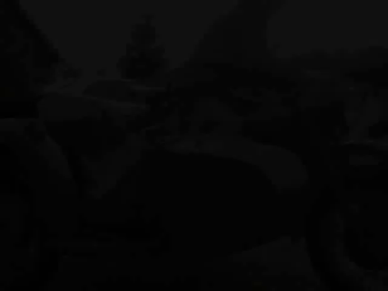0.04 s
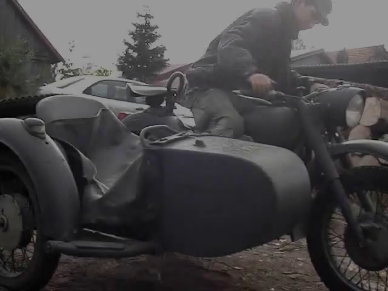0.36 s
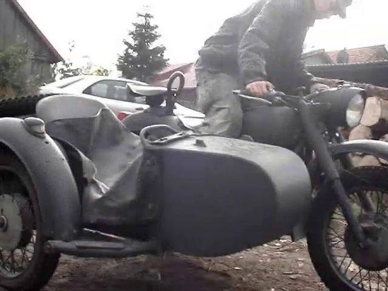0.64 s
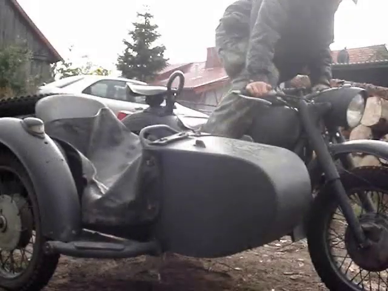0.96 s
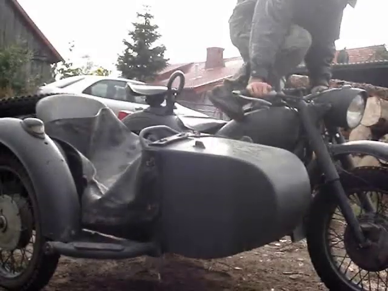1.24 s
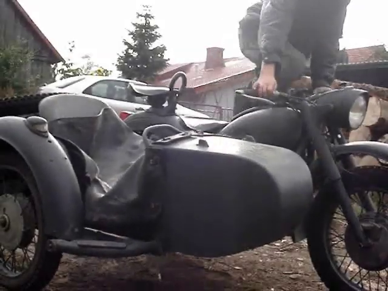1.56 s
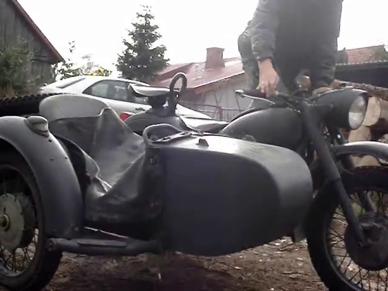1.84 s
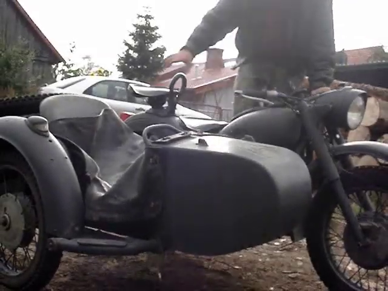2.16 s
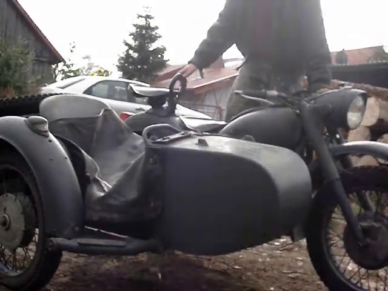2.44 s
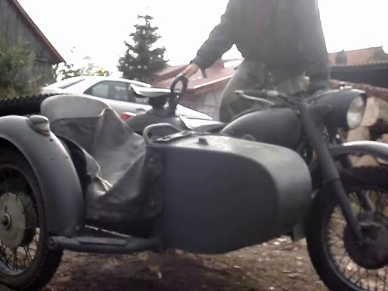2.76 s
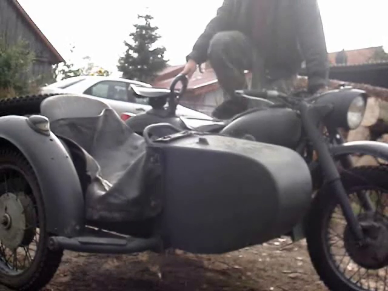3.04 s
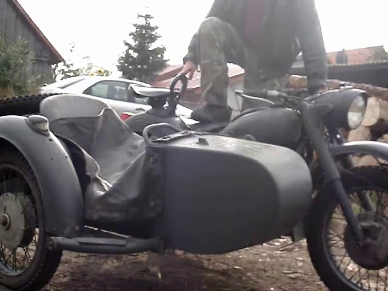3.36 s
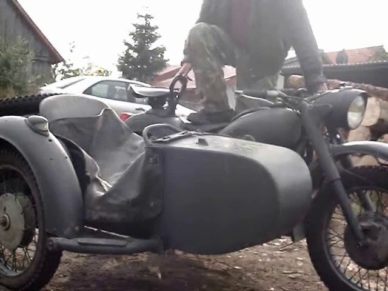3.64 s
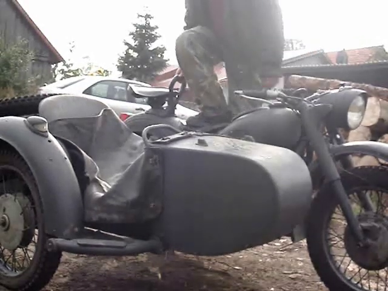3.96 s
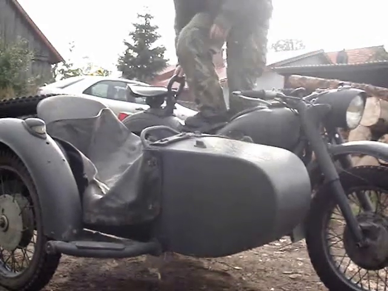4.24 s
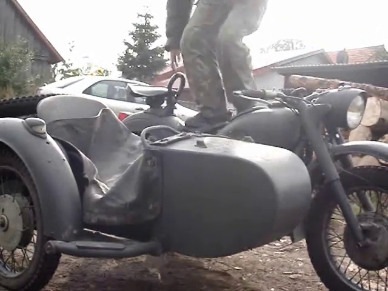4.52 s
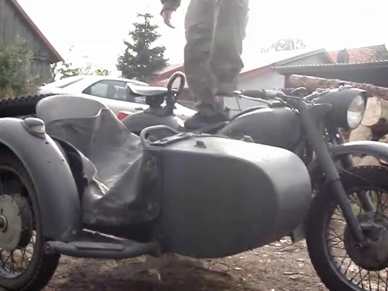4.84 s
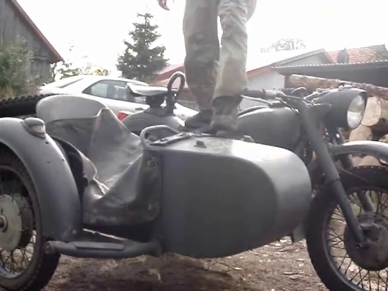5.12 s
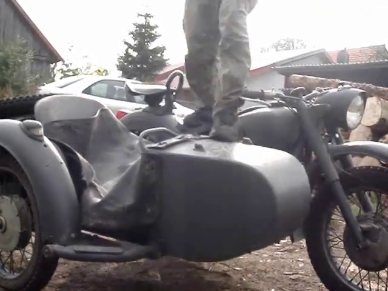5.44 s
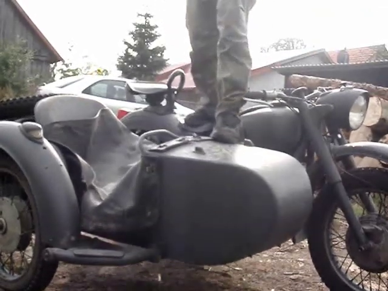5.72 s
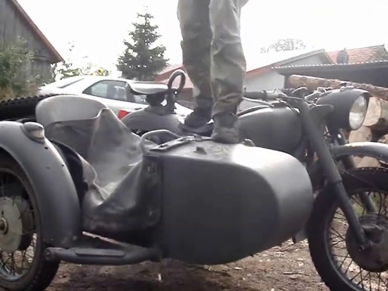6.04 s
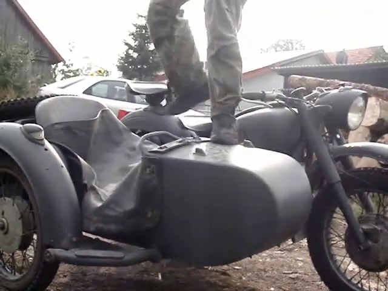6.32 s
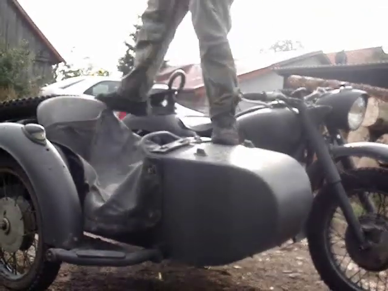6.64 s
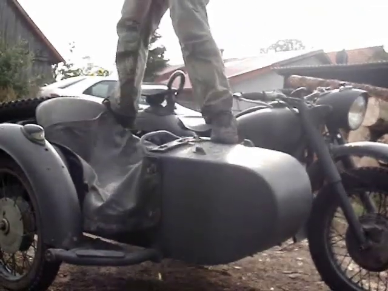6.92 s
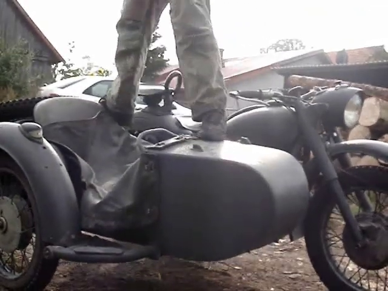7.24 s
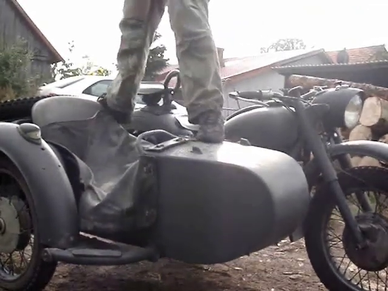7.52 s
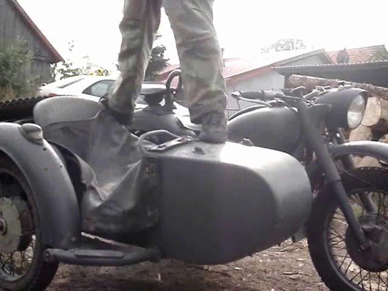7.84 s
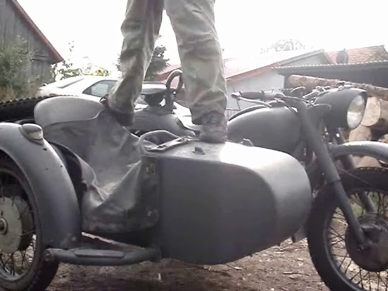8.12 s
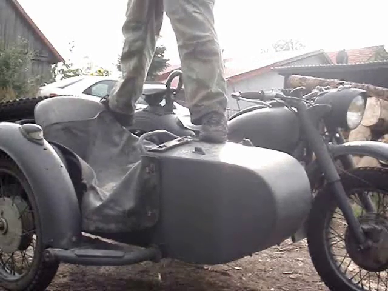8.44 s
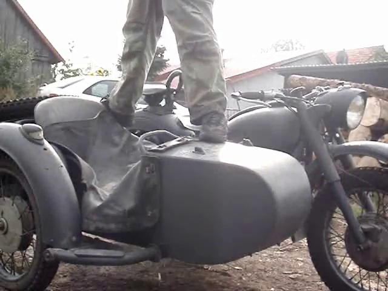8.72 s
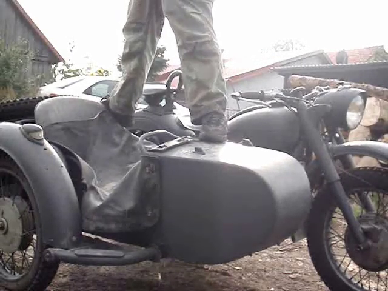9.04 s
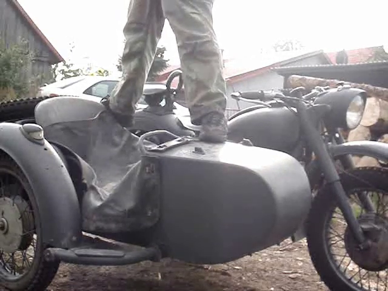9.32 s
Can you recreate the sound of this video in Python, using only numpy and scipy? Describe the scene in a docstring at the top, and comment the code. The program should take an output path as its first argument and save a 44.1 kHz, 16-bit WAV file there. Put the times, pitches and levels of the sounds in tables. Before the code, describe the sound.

After a split second of engine clatter, someone climbs over a motorcycle and sidecar, with light metal clanks, dull thuds and short creaks.

```python
"""A quiet yard, the microphone beside an old flat-twin motorcycle with a sidecar.
The engine clatters for an instant and breaks off. Someone clambers over the outfit: boots ring the
tank and frame, then thud on the sidecar's sheet-metal nose. Mounts creak, loose fittings jingle,
soles and clothes scuff, the springs rumble under the weight. Small birds peep far off, and a faint
high rasp sets in at the very end."""
import sys
import numpy as np
from scipy import signal
from scipy.fft import rfft, irfft, next_fast_len
from scipy.io import wavfile

SR = 44100
rng = np.random.default_rng(int(sys.argv[2]) if len(sys.argv) > 2 else 0)


def log_audio(samples):
    """Write samples as a 16-bit WAV file to the path given in sys.argv[1]."""
    # one column per channel
    frames = np.atleast_2d(samples).T
    # limit to full scale, then quantise
    limited = np.clip(frames, -1, 1)
    pcm = np.round(limited * 32767).astype(np.int16)
    wavfile.write(sys.argv[1], SR, pcm)


N = 422037
TIME = np.arange(N) / SR

# Open air in the yard. Each row: frequency in Hz, relative level in dB.
YARD_COLOUR = [(12, -72), (20, -36), (54, -1), (136, 0), (233, -0.5), (398, -2), (631, -3), (2780, -14),
               (3160, -13), (3410, -14.5), (4870, -16.5), (5540, -17), (9000, -24), (11700, -41),
               (19800, -120)]
# The microphone's own hiss. Each row: frequency in Hz, relative level in dB.
HISS_COLOUR = [(3000, -45), (7000, 6), (9000, 1.5), (9900, 3.5), (10200, -8), (12500, -4), (15500, -2)]
# Thin electronic tones. Each row: frequency in Hz, level in dB.
WHINE_TONES = [(8123, -76.5), (11773, -94.5)]
# A narrow, wavering band of hiss. Each row: time in seconds, centre in Hz.
SIZZLE_PATH = [(0, 5600), (1.5, 5650), (2.2, 5300), (3, 5650), (5, 5790), (7.3, 5680), (9.57, 5790)]
# Distant bird notes. Each row: start in seconds, pitch in Hz, fall in Hz, level in dB.
BIRD_NOTES = [(3.405, 7400, 180, -63), (3.438, 7300, 700, -55), (3.678, 3380, 40, -62),
              (8.52, 3335, 0, -60)]
# Resonances of the rasp. Each row: frequency in Hz, width in Hz, gain in dB.
RASP_MODES = [(2900, 500, -6), (4000, 350, -3), (4700, 400, -4)]

# The climber's weight shifts. Each row: start in seconds, rumble level in dB.
WEIGHT_SHIFTS = [(1.439, -50.5), (5.77, -54), (6.21, -55.5), (6.35, -57), (6.78, -54), (6.865, -46),
                 (7.32, -54)]
# Rumble of the outfit on its springs. Each row: frequency in Hz, relative level in dB.
SWAY_COLOUR = [(20, -1.5), (35, -8.5), (70, 1), (140, -8.5), (300, -8.5), (700, -32), (2000, -84)]
# Soles and clothes rub. Each row: start in seconds, nominal length in seconds, level in dB.
SCUFFS = [(1.154, 0.13, -45), (3.578, 0.092, -48.5), (4.07, .06, -54.5), (6.687, 0.014, -48.5),
          (6.856, 0.19, -50), (7.363, .012, -42), (7.383, .12, -53)]
# A boot skids, ever louder, until it catches. Each row: start and length in seconds, level in dB.
SKIDS = [(1.441, .02, -36.5), (7.268, 0.07, -40.5)]
# Rubbing on painted metal. Each row: frequency in Hz, relative level in dB.
SCUFF_COLOUR = [(200, -2), (700, 1), (1600, 3.5), (3000, -4), (4500, -4.5), (7000, -7.5), (11000, -23),
                (15000, -22)]
# The mounts creak. Each row: start in seconds, hold in seconds, level in dB.
CREAKS = [(4.7363, 0.028, -37.5), (5.563, .003, -38), (5.589, .026, -37)]
# Friction in the mounts. Each row: frequency in Hz, relative level in dB.
CREAK_COLOUR = [(120, -28), (220, -7), (600, -12), (950, -4.5), (1800, -6.5), (2500, -4.5), (3200, -14),
                (4800, -13), (7500, -20), (8700, -26), (12000, -31), (15500, -27)]
# Ringing of the mounts. Each row: frequency in Hz, width in Hz, gain in dB.
MOUNT_MODES = [(885, 23, 6), (1220, 40, 9.5), (1560, 40, 5), (1836, 15, 16.5), (1870, 60, -3),
               (2470, 33, 3), (4230, 170, -4.5), (5100, 100, -12)]
# Loose fittings on the sidecar. Each row: frequency in Hz, width in Hz, gain in dB.
FITTING_MODES = [(11260, 160, 5), (11800, 70, -2), (12400, 200, 4), (13000, 120, -2), (14700, 400, -7)]

# Boots on tank and frame. Each row: start in seconds, clank level in dB, hardness from 0 (flat sole
# in mid-panel) to 1 (hard edge on the rim), clank t60 in seconds.
BIKE_KNOCKS = [(1.174, -43.5, 0.22, 0.02), (1.265, -48, 0.48, .25), (1.308, -41.5, .27, 0.17),
               (1.371, -47.5, 0.68, .12), (1.449, -27.5, 0.74, 0.095), (1.727, -47, 0.99, 0.12),
               (3.039, -53.5, 0.42, .03), (3.513, -42, 0.42, 0.032), (3.528, -46.5, 0.53, 0.03),
               (3.805, -62.5, 0, .085), (4.222, -42.5, 1, 0.13), (5.046, -53, 0.8, .05)]
# Boots on the sidecar, in the same columns.
SIDECAR_KNOCKS = [(5.314, -46.5, 1, 0.0089), (5.319, -43.5, 0.034, .13), (5.355, -34.5, 0.39, 0.092),
                  (5.379, -45, 0.013, 0.27), (5.731, -48.5, 0.31, .07), (5.842, -52.5, 0.92, 0.078),
                  (6.069, -30, 0.67, .13), (6.867, -54, 0.14, 0.096), (7.242, -53, 0.21, .13),
                  (7.33, -44.5, 0.17, 0.18), (7.351, -47.5, 0.2, 0.05), (8.068, -54, 0.21, 0.13)]
# Modes of the tank. Each row: frequency in Hz, strength in dB when struck in the middle, strength
# in dB when struck at the rim, t60 in seconds.
TANK_MODES = [(78.6, -18, -6, .3), (203, 4, -20, 0.28), (284, 11.5, -15, 0.069), (384, -10, 4.5, 0.17),
              (522, 1, 1.5, 0.086), (570, -36, -2, 0.19), (676, -3.5, -7, 0.24), (815, 6.5, -21, 0.11),
              (936, -12, -7.5, 0.28), (1240, -19, -9, 0.14), (1378, -23, 6.5, 0.11), (1576, -8, 3, 0.044),
              (1974, -10, -3, 0.18), (2600, -11, -9, 0.23), (3420, -23, -2, .08), (4270, -13, -23, 0.056),
              (5180, -26, 5, 0.043)]
# Modes of the sidecar's shell, in the same columns.
SHELL_MODES = [(87, -10, -17, 0.39), (129, -7, -15, 0.17), (211.2, -5.5, -6.5, 0.29),
               (262.8, -0.5, -5, 0.43), (286.7, 3, 0, 0.19), (345.4, -5, -1, 0.59), (456, -9, -21, 0.16),
               (509, -6, -17, 0.22), (673, 6, -13, 0.13), (738, -4, -10, 0.44), (898, -13, -1, 0.12),
               (940, -14, 5.5, 0.06), (980, -22, -0.5, 0.13), (1351, -32, -8, 0.14), (1630, -29, -9, 0.13),
               (1855, -28, -2, 0.069), (2230, -34, -7.5, 0.14), (2770, -36, -12, 0.17)]

# The engine's effort. Each row: time in seconds, level in dB.
ENGINE_EFFORT = [(0.0, -18), (0.084, -19.5), (0.108, -17), (0.125, -19)]
# Clatter from the engine block. Each row: frequency in Hz, relative level in dB.
ENGINE_COLOUR = [(30, -28), (60, -7), (90, -7), (170, -5.5), (260, -9), (400, -0.5), (750, 2), (1050, 2.5),
                 (1800, -7), (3000, -3.5), (5500, -11.5), (8500, -22.5), (12000, -26.5), (15500, -21.5)]
# Ringing of cylinder fins and casings. Each row: frequency in Hz, width in Hz, gain in dB.
CASING_MODES = [(425, 64, 9.5), (610, 31, -18), (775, 110, -6), (960, 39, -7), (1040, 90, 3),
                (1480, 84, 20), (1600, 81, 15.5), (2160, 230, 17), (2580, 150, 15), (3530, 130, -18),
                (5840, 110, -14), (7200, 140, -22)]

FIRING_HZ, ENGINE_STOP_S = 44, .1245
SOFT_THUD_DB, HARD_THUD_DB = 12, -15   # thud against clank, for the softest and the hardest blow
MIDDLE_HARDNESS, RIM_HARDNESS = 0.23, 0.65   # the panel stiffens from its middle to its rim


def from_db(db):
    """Decibels to gain."""
    return 10 ** (np.asarray(db) / 20)


def rms_one(x):
    """Scale to unit rms."""
    return x / np.sqrt(np.mean(x ** 2) + 1e-20)


def in_time(rows):
    """A curve through rows of time in seconds and value."""
    return np.interp(TIME, *np.transpose(rows))


def fade(t, t60):
    """Exponential decay by 60 dB in t60."""
    return np.exp(-np.log(1000) * np.maximum(t, 0) / t60)


def drift(per_s):
    """Slow random wander, spread about 1."""
    steps = rng.standard_normal(int(N / SR * per_s) + 2)
    return np.interp(TIME * per_s, np.arange(len(steps)), steps)


def passband(x, hz, kind, order=2):
    """Causal Butterworth filter."""
    return signal.sosfilt(signal.butter(order, hz, kind, fs=SR, output="sos"), x + 1e-18)


def colour(x, spectrum):
    """Minimum-phase filter that follows rows of frequency in Hz and level in dB."""
    hz, db = np.transpose(spectrum)
    size = next_fast_len(len(x) + SR // 4, True) * 2
    grid = np.maximum(np.fft.rfftfreq(size, 1 / SR), 1)
    gain = from_db(np.interp(np.log(grid), np.log(hz), db))
    cepstrum = irfft(np.log(gain))
    cepstrum[0] /= 2
    response = np.exp(rfft(2 * cepstrum[:size // 2], size))
    return irfft(rfft(x, size) * response)[:len(x)]


def noise(spectrum):
    """Steady coloured noise, rms 1."""
    return rms_one(colour(rng.standard_normal(N), spectrum))


def resonate(x, modes):
    """Parallel resonances of alternating polarity."""
    return sum((-1) ** k * from_db(db) * signal.lfilter(*signal.iirpeak(hz, hz / width, SR), x + 1e-18)
               for k, (hz, width, db) in enumerate(modes))


def grains(per_s, spread_db):
    """Random tiny impacts of uneven size, rms 1."""
    impacts = (rng.random(N) < per_s / SR) * rng.choice([-1, 1], N)
    sizes = from_db(spread_db * np.clip(rng.standard_normal(N), -2, 2))
    return rms_one(impacts * sizes)


def strokes(rows):
    """Envelope of swells that die away. Each row: start, rise, hold and t60 in seconds, level in dB."""
    power = np.zeros(N)
    for start, rise, hold, t60, db in rows:
        onset = np.clip((TIME - start) / max(rise, 1 / SR), 0, 1)
        power += (from_db(db) * onset * fade(TIME - start - rise - hold, t60)) ** 2
    return np.sqrt(power)


def background(yard_db=-54.5, hiss_db=-70, sizzle_db=-72, wander_hz=50):
    """Outdoor air, and the microphone's own hiss and whine."""
    whine = sum(np.sqrt(2) * from_db(db) * np.sin(2 * np.pi * hz * TIME) for hz, db in WHINE_TONES)
    centre_hz = in_time(SIZZLE_PATH) + wander_hz * drift(per_s=2.5)
    flicker = passband(rng.standard_normal(N), 85, "low")
    sizzle = from_db(sizzle_db) * rms_one(flicker * np.sin(2 * np.pi * np.cumsum(centre_hz) / SR))
    return from_db(yard_db) * noise(YARD_COLOUR) + from_db(hiss_db) * noise(HISS_COLOUR) + sizzle + whine


def birds(waver_hz=30, note_s=.046):
    """Small birds far from the microphone peep thin notes, level or falling."""
    out = np.zeros(N)
    waver = waver_hz * rms_one(passband(rng.standard_normal(N), 200, "low"))
    for start, pitch_hz, fall_hz, db in BIRD_NOTES:
        along = np.clip((TIME - start) / note_s, 0, 1)
        hz = pitch_hz - fall_hz * along + waver
        out += from_db(db) * np.sin(np.pi * along) * np.sin(2 * np.pi * np.cumsum(hz) / SR)
    return out


def rasp(start_s=9.475, rise_s=0.025, t60=2, db=-58):
    """A faint, grainy high rasp sets in."""
    swell = strokes([(start_s, rise_s, 0, t60, db)])
    return swell * rms_one(resonate(grains(2200, spread_db=4), RASP_MODES))


def sway(rise_s=0.029, rumble_t60=1.37, bump_t60=.3, bump_db=2.5):
    """The suspension takes each shift of weight with a dull bump and a rumble that the springs damp."""
    rocking = strokes([(start, rise_s, 0, rumble_t60, db) for start, db in WEIGHT_SHIFTS])
    rumble = rocking * noise(SWAY_COLOUR)
    bump = strokes([(start, .005, 0, bump_t60, db + bump_db) for start, db in WEIGHT_SHIFTS])
    return rumble + bump * rms_one(passband(rng.standard_normal(N), [90, 190], "band"))


def scuffs(skid_t60=0.031, climb_s=(0.89, 7.5), rustle_db=-67, swing_db=5):
    """Grit and cloth drag over painted metal: scuffs swell and ebb, skids stop short, clothes rustle."""
    rubs = [(start, 0.36 * length, 0, 1.7 * length, db) for start, length, db in SCUFFS]
    skids = [(start, length, 0, skid_t60, db) for start, length, db in SKIDS]
    climbing = (TIME > climb_s[0]) * (TIME < climb_s[1])
    rustle = from_db(rustle_db + swing_db * drift(per_s=10)) * climbing
    friction = rms_one(colour(grains(6000, spread_db=5.5), SCUFF_COLOUR))
    return np.hypot(strokes(rubs + skids), rustle) * friction


def creaks(slips_per_s=1000, rub_db=-3, ring_db=-1, rise_s=0.0025):
    """Loaded mounts stick and slip in quick uneven jerks; a longer creak also dies more slowly."""
    slips = grains(slips_per_s, spread_db=-0.5) + from_db(rub_db) * rng.standard_normal(N)
    load = strokes([(start, rise_s, hold, 0.063 + 4.9 * hold, db) for start, hold, db in CREAKS])
    friction = rms_one(colour(slips, CREAK_COLOUR))
    ringing = from_db(ring_db) * rms_one(resonate(slips, MOUNT_MODES))
    return load * rms_one(friction + ringing)


def jingle(sidecar_db=-29, bike_db=-30, t60=0.24):
    """Each knock shakes the sidecar's small loose fittings."""
    shakes = [(start, .003, 0, t60, db + passed_db)
              for rows, passed_db in ((SIDECAR_KNOCKS, sidecar_db), (BIKE_KNOCKS, bike_db))
              for start, db, *_ in rows]
    ringing = resonate(grains(3000, spread_db=-4), FITTING_MODES)
    return strokes(shakes) * rms_one(passband(ringing, 9000, "high"))


def boot_knocks(rows, modes, dense_db, dull_hz, crack_db, tail_db, tail_t60, thud_stretch, soft_click_db):
    """A boot rings a panel's main modes and a dense crowd of short ones, as thud, clank and click."""
    out = np.zeros(N + SR)
    t = np.arange(SR // 2) / SR
    attack = slice(0, SR // 50)
    hz, middle_db, rim_db, ring_t60 = np.transpose(modes)[:, :, None]
    crack = from_db(crack_db) * fade(t, t60=.014)   # the first instant of contact
    tail = from_db(tail_db) * fade(t, tail_t60)
    pressing = 1 - fade(t, t60=0.0045)   # a rubber sole takes a moment to load the panel
    for start, clank_db, hardness, t60 in rows:
        thud_db = clank_db + SOFT_THUD_DB + hardness * (HARD_THUD_DB - SOFT_THUD_DB)
        click_db = clank_db + soft_click_db * (1 - hardness ** 2)
        toward_rim = np.clip((hardness - MIDDLE_HARDNESS) / (RIM_HARDNESS - MIDDLE_HARDNESS), 0, 1)
        strength = from_db(middle_db + toward_rim * (rim_db - middle_db)) * rng.choice([-1, 1], hz.shape)
        damped_t60 = np.minimum(ring_t60, 2.3 * t60)   # a sole that stays on the panel damps it
        ringing = np.sum(strength * np.sin(2 * np.pi * hz * t) * fade(t, damped_t60), axis=0)
        ringing /= np.std(ringing[attack])
        bands = [("thud", [85, 500], thud_db, t60 * thud_stretch),
                 ("clank", [500, 1600], clank_db, t60),
                 ("click", [2300, 6000], click_db, t60 * 0.78)]
        for name, edges_hz, db, band_t60 in bands:
            dense = from_db(dense_db) * passband(rng.standard_normal(len(t)), dull_hz, "low", order=1)
            dense *= crack + fade(t, band_t60) + tail
            part = passband((ringing + dense) * pressing, edges_hz, "band", order=3)
            if name == "click":   # the hard edge of the contact reaches far into the treble
                part += from_db(-9.0) * passband(dense, 7400, "high")
            out[round(start * SR):][:len(t)] += from_db(db) * part / np.std(part[attack])
    return out[:N]


def engine(beat_depth=0.27, valve_db=-12, casing_db=-4, exhaust_db=-17, lag_s=0.0045, tail_db=-19):
    """Each firing gives an exhaust thump and a spray of piston and valve clatter; the casings ring."""
    phase = 2 * np.pi * FIRING_HZ * (TIME - lag_s)
    beat = (1 + np.cos(phase)) / 2
    clatter = grains(12000, spread_db=3.0) * (1 - beat_depth + beat_depth * beat)
    block = rms_one(colour(clatter, ENGINE_COLOUR))
    casings = from_db(casing_db) * rms_one(resonate(clatter, CASING_MODES))
    ticks = grains(6900, spread_db=10) * beat ** 2
    valves = from_db(valve_db) * rms_one(passband(ticks, [3000, 7500], "band"))
    # the silencer booms on the second order
    exhaust = from_db(exhaust_db) * rms_one(passband(signal.sawtooth(phase), [62, 105], "band"))
    running = rms_one(block + casings + valves + exhaust)
    since_stop = TIME - ENGINE_STOP_S
    gate = np.maximum(fade(since_stop, t60=0.0045), from_db(tail_db) * fade(since_stop, t60=0.074))
    return running * from_db(in_time(ENGINE_EFFORT)) * gate


def scene():
    """One microphone: engine and climber close by, the yard and its birds behind."""
    motor = engine()
    bike = boot_knocks(BIKE_KNOCKS, TANK_MODES, dense_db=9, dull_hz=4970, crack_db=7,
                       tail_db=-22.0, tail_t60=0.97, thud_stretch=3.3, soft_click_db=-19.5)
    sidecar = boot_knocks(SIDECAR_KNOCKS, SHELL_MODES, dense_db=4, dull_hz=1600, crack_db=13,
                          tail_db=-10.5, tail_t60=0.39, thud_stretch=4.3, soft_click_db=-36.5)
    climber = bike + sidecar + jingle() + creaks() + scuffs() + sway()
    return (motor + climber + birds() + rasp() + background())[None]


def record(dry):
    """A steep low-pass after the microphone cuts the top of the treble."""
    cutoff_hz = 15850
    return signal.sosfilt(signal.ellip(12, .1, 80, cutoff_hz, fs=SR, output="sos"), dry)


dry = scene()
out = record(dry)
log_audio(out)
```